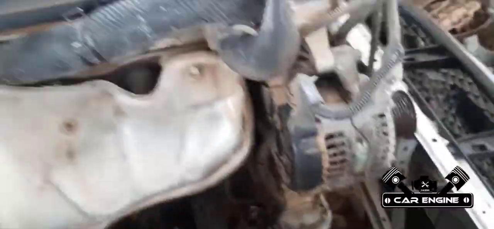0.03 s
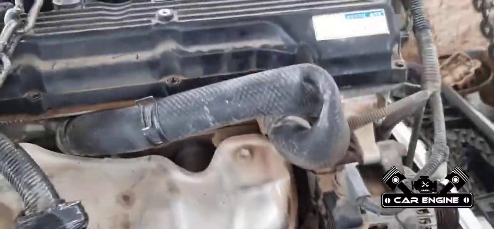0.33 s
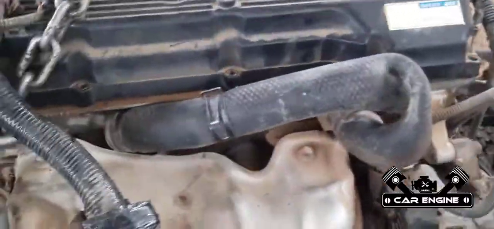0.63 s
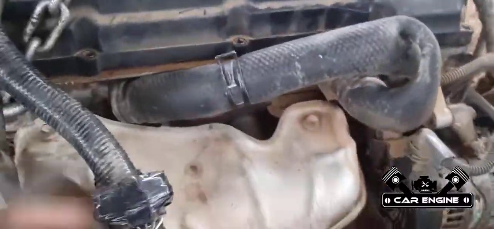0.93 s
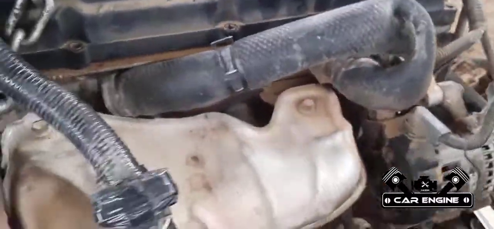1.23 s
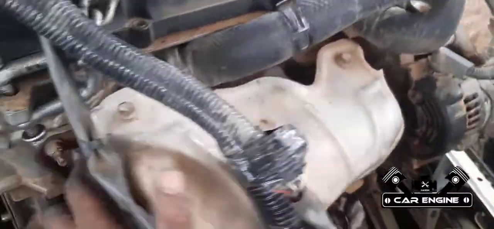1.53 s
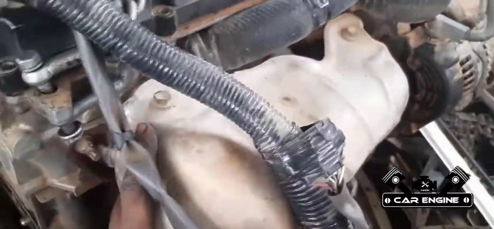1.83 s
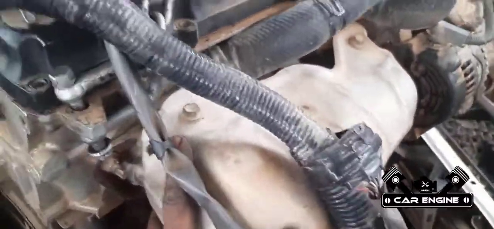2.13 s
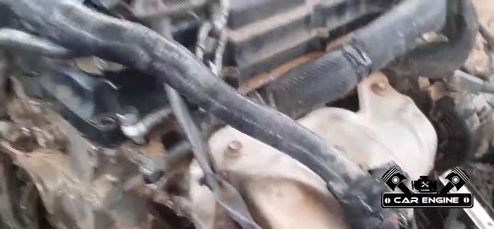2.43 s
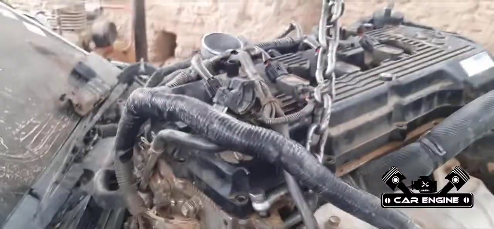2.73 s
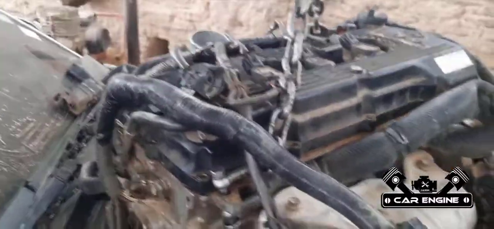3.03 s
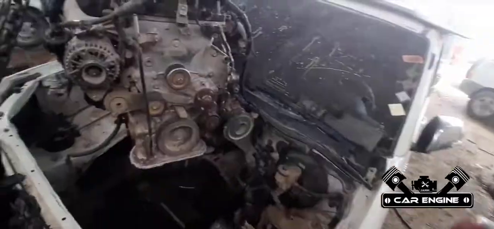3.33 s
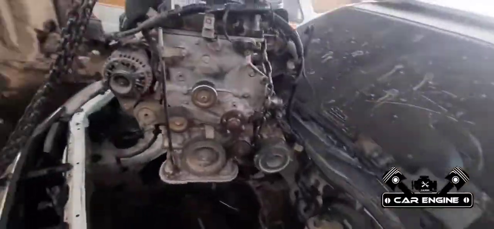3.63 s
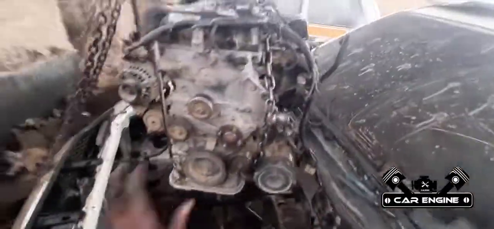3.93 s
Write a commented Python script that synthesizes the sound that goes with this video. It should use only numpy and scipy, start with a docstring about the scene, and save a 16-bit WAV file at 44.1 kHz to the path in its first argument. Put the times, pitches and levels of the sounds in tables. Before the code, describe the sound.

A chain hoist rattles close by, its links clacking and jingling in quick pulls.

```python
"""A chain hoist lifts an engine in an open workshop, close by and to the right. The hand chain is hauled about
three times a second: its links clack over the wheel and ring the housing, the rest jingles, and the slack loop
knocks about between pulls. After a soft bump on the microphone and a moment of near silence, the scene changes:
another chain runs with a duller, denser rattle."""
import sys
import numpy as np
from scipy import signal
from scipy.fft import rfft, irfft, next_fast_len
from scipy.io import wavfile
from scipy.ndimage import uniform_filter1d

SR = 44100
rng = np.random.default_rng(int(sys.argv[2]) if len(sys.argv) > 2 else 0)


def master_out(mix):
    """Clip the mix to full scale and print it as 16-bit PCM to the path in sys.argv[1]."""
    frames = np.transpose(np.atleast_2d(mix))
    ceiling = np.clip(frames, -1, 1)
    pcm = np.round(ceiling * 32767).astype(np.int16)
    wavfile.write(sys.argv[1], SR, pcm)


N = 176400


def amp(db):
    return 10 ** (np.asarray(db) / 20)


def curve_at(points, hz):
    """Interpolate (freq_hz, value) points on a log axis."""
    point_hz, values = np.transpose(points)
    return np.interp(np.log(hz + 1), np.log(point_hz + 1), values)


def convolved(x, response):
    return signal.fftconvolve(np.atleast_2d(x), np.atleast_2d(response), axes=1)[:, :N]


def body(x, colour, resonances=(), size=8192):
    """Minimum-phase body of unit energy: broad colour plus resonances."""
    hz = np.fft.rfftfreq(size, 1 / SR)
    lift = 1 + sum((amp(db) ** 2 - 1) / (1 + (2 * (hz - centre_hz) / width_hz) ** 2)
                   for centre_hz, width_hz, db in resonances)
    cepstrum = irfft(np.log(amp(curve_at(colour, hz)) * np.sqrt(np.abs(lift)) + 1e-6))
    cepstrum[1:size // 2] *= 2
    cepstrum[size // 2 + 1:] = 0
    response = irfft(np.exp(rfft(cepstrum)))
    return convolved(x, response / np.linalg.norm(response))


def bursts(times_s, levels_db, t60_s, attack_s=0.0024):
    """A dying noise burst per contact, in two independent channels."""
    power = np.bincount((np.abs(times_s) * SR).astype(int), amp(levels_db) ** 2, N)[:N]
    t = np.arange(SR // 4) / SR
    envelope = amp(-60 * t / t60_s) * (1 - np.exp(-t / attack_s))
    return np.sqrt(np.abs(convolved(power, envelope ** 2))) * rng.standard_normal((2, N))


def rattle(rate_hz, spread_db, t60_s, count=4000):
    """Contacts of uneven spacing and strength, rms 1."""
    jitter, strength = rng.standard_normal((count, 2)).T
    times_s = (np.arange(count) + 0.5 * jitter) / rate_hz
    contacts = bursts(times_s, spread_db * np.clip(strength, -2, 2), t60_s)
    return contacts / np.sqrt(np.mean(contacts ** 2) + 1e-20)


def struck_modes(hits, modes, attack_s=0.001, detune=0.015):
    """Each (start_s, level_db) hit rings the modes, varying slightly in pitch and strength."""
    t = np.arange(SR // 8) / SR
    attack = 1 - np.exp(-t / attack_s)
    out = np.zeros((2, N + SR))
    for start_s, hit_db in hits:
        for hz, mode_db, t60_s in modes:
            pitch_jitter, jitter_db = rng.standard_normal(2)
            tone = np.sin(2 * np.pi * (hz * (1 + detune * pitch_jitter) * t + rng.random((2, 1))))
            decay = amp(hit_db + mode_db + jitter_db - 60 * t / t60_s)
            out[:, round(start_s * SR):][:, :len(t)] += tone * decay * attack
    return out[:, :N]


# Workshop background: freq_hz, gain_db
AIR_COLOUR = [(25, -17), (120, 9.5), (500, -24), (2200, -10), (12000, -23)]


def workshop(x, echo_db=-6.5, t60_s=0.11, air_db=-55.5):
    """Add the short, weak echo and steady background of the open workshop."""
    t = np.arange(SR // 2) / SR
    tail = rng.standard_normal((2, len(t))) * amp(-60 * t / t60_s) * (t > 0.004)
    air = amp(air_db) * body(rng.standard_normal((2, N)), AIR_COLOUR)
    return x + amp(echo_db) * convolved(x, tail / np.linalg.norm(tail[0])) + air


# Balance of the hauling and of the duller run: freq_hz, left_minus_right_db
HAUL_BALANCE = [(100, -1), (400, -3), (1700, -1.5), (3100, -9), (3700, -18), (6200, -15), (9000, -23),
                (14000, -11)]
RUN_BALANCE = [(100, -1.5), (1250, -1.5), (2100, -14.5), (3000, -21), (4300, -12.5), (6300, -26),
               (15000, -4.5)]
# Likeness of the two sides: freq_hz, coherence
COHERENCE = [(60, 1), (200, 1), (1300, 0.75), (2400, 0), (4000, 0.23)]


def placed(pair, balance):
    """Mix two independent channels to stereo: bass alike, treble to the right."""
    size = next_fast_len(N + SR // 4)
    hz = np.fft.rfftfreq(size, 1 / SR)
    coherence = np.clip(curve_at(COHERENCE, hz), 0, 1)
    left_gain = amp(curve_at(balance, hz))
    angle = np.arccos(coherence) / 2
    mid, side = rfft(pair, size) * np.array([np.cos(angle), np.sin(angle)])
    mono_gain = np.sqrt(1 + left_gain ** 2 + 2 * coherence * left_gain) / 2
    return irfft(np.array([left_gain * (mid + side), mid - side]) / mono_gain, size)[:, :N]


def bump(start_s=3.278, pitch_hz=300, level_db=-10, attack_s=0.002, t60_s=0.02, sag_s=0.033):
    """A soft low thud on the microphone, sagging in pitch."""
    t = np.maximum(np.arange(N) / SR - start_s, 0)
    envelope = amp(level_db - 60 * t / t60_s) * (1 - np.exp(-t / attack_s))
    return envelope * np.sin(2 * np.pi * pitch_hz * t / (1 + t / sag_s))


# Slack-loop swings in the hauling and in the duller run: start_s, length_s, level_db
HAUL_SWINGS = [(0.004, 0.076, -37.5), (0.108, 0.028, -36), (1.15, 0.073, -46), (0.345, 0.09, -37),
               (0.688, 0.077, -40.5), (0.885, 0.028, -38), (1.01, 0.057, -39), (1.38, 0.046, -38),
               (1.7, 0.17, -38), (2.065, 0.1, -40), (2.18, 0.029, -36), (2.765, 0.072, -38)]
RUN_SWINGS = [(3.33, 0.24, -59), (3.93, 0.18, -32)]
# Slack-loop knock: freq_hz, gain_db
SLACK_COLOUR = [(30, -43), (80, -14.5), (135, -1.5), (370, 3), (560, 0), (800, 1.5), (1400, -1.5),
                (2300, 0.5), (4000, -0.5), (9000, -36.5)]


def slack_loop(swings, swing_db=8, rest_db=-40.5):
    """The hanging loop knocks dully, swelling with each swing."""
    t = np.arange(N) / SR
    gain = amp(rest_db)
    for start_s, length_s, db in swings:
        progress = np.clip((t - start_s) / length_s, 0, 1)
        gain = gain + amp(db + swing_db) * np.sqrt(np.abs(np.sin(np.pi * progress)))
    return body(gain * rattle(rate_hz=170, spread_db=2, t60_s=0.035), SLACK_COLOUR)


# Free links: start_s, pitch_hz, level_db
CLINKS = [(0.03, 3140, -21), (0.56, 3790, -27), (0.646, 3200, -13.5), (0.921, 4380, -17),
          (0.921, 4880, -17.5), (0.997, 4580, -21.5), (1.559, 4280, -22), (1.779, 3070, -16),
          (1.799, 2950, -23), (2.055, 4110, -15), (2.111, 3160, -20)]


def clinks(t60_s=0.1):
    """Single links swing free and ring at their own pitch."""
    return sum(struck_modes([(start_s, db)], [(hz, 0, t60_s)]) for start_s, hz, db in CLINKS)


# Running-chain envelope: time_s, level_db
RUN_ENVELOPE = [(3.33, -25), (3.4, -22.5), (3.48, -30), (3.57, -29), (3.66, -24.5), (3.73, -22.5),
                (3.86, -19.5), (3.915, -25), (3.96, -21.5), (4, -24)]
# Heavy clashes: start_s, level_db
RUN_CLASHES = [(3.349, -5.5), (3.392, -13), (3.439, -11.5), (3.522, -12.5), (3.62, -9.5), (3.672, -7.5),
               (3.716, -5.5), (3.79, -22)]
# Modes rung by the running links: pitch_hz, level_db, t60_s
RUN_MODES = [(835, -2, 0.05), (868, -3, 0.05), (2880, -3, 0.05), (3000, -2, 0.05)]
# Dull rattle: freq_hz, gain_db
RUN_COLOUR = [(30, -21), (100, -7), (500, -10.5), (750, -1.5), (1050, 1.5), (1600, 5), (1880, -2),
              (3300, 3), (4000, -0.5), (4800, -3), (5500, 1), (6500, -2.5), (7600, -11.5), (8600, -21.5),
              (10000, -16), (15800, -19)]
# Its resonances: centre_hz, width_hz, lift_db
RUN_RESONANCES = [(2220, 140, 7.7), (2956, 66, 9.7)]


def dull_run(start_s, ring_end_s=3.89, link_rate_hz=63, rattle_db=-3, clash_db=-10.5):
    """Another chain runs, rattling and clashing; its links ring lower and stop ringing near the end."""
    envelope_s, envelope_db = np.transpose(RUN_ENVELOPE)
    gain = amp(rattle_db + np.interp(np.arange(N) / SR, envelope_s, envelope_db))
    rattling = gain * rattle(rate_hz=240, spread_db=4.5, t60_s=0.076)
    hits_s = np.arange(start_s, ring_end_s, 1 / link_rate_hz)
    ringing = struck_modes(zip(hits_s, np.interp(hits_s, envelope_s, envelope_db)), RUN_MODES)
    times_s, levels_db = np.transpose(RUN_CLASHES)
    clashes = bursts(times_s, levels_db + clash_db, t60_s=0.073)
    return ringing + body(rattling + clashes, RUN_COLOUR, RUN_RESONANCES)


# Steel on steel: freq_hz, gain_db
STEEL_COLOUR = [(100, -28), (800, -19), (1150, -6), (2700, -1), (3400, 1.5), (4600, 4.5), (5800, -4.5),
                (7700, -4), (9800, -4.5), (12200, -24), (13500, -18.5), (15800, -16)]
# Link and housing resonances: centre_hz, width_hz, lift_db
STEEL_RESONANCES = [(1134, 84, 19.5), (1690, 81, 11.5), (3110, 120, 7.5), (4117, 41, 8.5), (4365, 34, 7.5),
                    (6215, 90, 10.5), (7500, 165, 9), (8020, 133, 11)]


def steel(contacts):
    """Contacts excite the steel of the links and housing."""
    return body(contacts, STEEL_COLOUR, STEEL_RESONANCES)


# Hand-chain pulls: start_s, release_s, level_db
PULLS = [(-.05, 0.026, -20.5), (0.21, 0.39, -21.5), (0.476, 0.664, -21.5), (.86, 1.01, -23.5),
         (1.184, 1.404, -20), (1.555, 1.773, -23), (1.91, 2.101, -21), (2.246, 2.457, -26.5),
         (2.62, 2.821, -22), (2.962, 3.183, -23)]


def jingle(level_db=-3.5, rest_db=-32.5, swell_db=7, attack_s=0.0036, coast_s=0.13):
    """Links jostle, louder as each pull gathers speed, and settle once the hand lets go."""
    t = np.arange(N) / SR
    power = amp(rest_db) ** 2
    for start_s, release_s, db in PULLS:
        remaining = np.clip((release_s - t) / (release_s - start_s), 0, 1)
        attack = np.clip((t - start_s) / attack_s, 0, 1)
        coast = np.clip(1 - (t - release_s) / coast_s, 0, 1)
        power = power + (amp(db - swell_db * remaining) * attack * coast) ** 2
    contacts = rattle(rate_hz=290, spread_db=1.5, t60_s=0.021)
    return amp(level_db) * steel(np.sqrt(power) * contacts)


# Links striking the wheel: start_s, level_db
LINK_HITS = [(0.001, -16), (0.034, -14), (0.058, -14), (0.092, -19), (0.148, -21), (0.184, -21),
             (0.246, -18), (0.269, -17), (0.293, -14), (0.314, -13), (0.354, -14), (0.371, -14),
             (0.388, -15), (0.423, -16), (0.497, -14), (0.559, -14), (0.577, -12), (0.596, -13),
             (0.615, -15), (0.633, -12), (0.651, -14), (0.81, -17), (0.842, -13), (0.867, -17),
             (0.919, -15), (0.937, -18), (0.973, -12), (0.996, -15), (1.063, -16), (1.176, -19),
             (1.227, -14), (1.25, -14), (1.273, -11), (1.294, -15), (1.312, -17), (1.329, -15),
             (1.343, -14), (1.36, -14), (1.421, -12), (1.438, -14), (1.461, -17), (1.537, -18),
             (1.558, -15), (1.582, -17), (1.638, -16), (1.658, -16), (1.68, -16), (1.7, -16), (1.721, -16),
             (1.751, -15), (1.918, -16), (1.941, -17), (1.967, -14), (1.989, -17), (2.011, -10),
             (2.027, -14), (2.062, -14), (2.095, -13), (2.11, -14), (2.237, -21), (2.271, -18), (2.3, -16),
             (2.374, -20), (2.403, -16), (2.427, -16), (2.451, -15), (2.503, -18), (2.537, -21),
             (2.626, -21), (2.658, -20), (2.718, -14), (2.74, -15), (2.762, -16), (2.781, -14), (2.83, -14),
             (2.849, -13), (2.942, -16), (2.964, -13), (2.986, -13), (3.008, -15), (3.067, -15),
             (3.084, -14), (3.103, -14), (3.121, -12), (3.141, -12), (3.159, -11), (3.177, -14),
             (3.199, -16), (3.225, -17), (3.254, -17)]
# Housing modes, and modes that sing in the last pulls: pitch_hz, level_db, t60_s
HOUSING_MODES = [(1140, -6.5, .03), (1195, -2.5, .038), (1580, -8, .03), (1700, -3, .044)]
SINGING_MODES = [(1718, -5.5, 0.13), (4280, -2, 0.11)]


def links_on_wheel(crack_db=0.5, housing_db=-2, singing_db=-4, singing_from_s=2.65):
    """Each link cracks against the wheel and rings the housing; two modes sing out in the last pulls."""
    times_s, levels_db = np.transpose(LINK_HITS)
    cracks = steel(bursts(times_s, levels_db + crack_db, t60_s=0.045))
    late_hits = [(start_s, db) for start_s, db in LINK_HITS if start_s > singing_from_s]
    singing = amp(singing_db) * struck_modes(late_hits, SINGING_MODES)
    housing = amp(housing_db) * struck_modes(LINK_HITS, HOUSING_MODES)
    return cracks + housing + singing


def scene(gap_start_s=3.308, gap_end_s=3.328, gap_db=-28.5):
    """Hauling, a moment of near silence, then the scene changes to the duller run."""
    t = np.arange(N) / SR
    hauled_chain = links_on_wheel() + clinks() + jingle() + slack_loop(HAUL_SWINGS)
    hauling = workshop(placed(hauled_chain, HAUL_BALANCE) + bump())
    running_chain = dull_run(gap_end_s) + slack_loop(RUN_SWINGS)
    running = workshop(placed(running_chain, RUN_BALANCE))
    gates = np.array([t < gap_start_s, t > gap_end_s], float)
    before, after = uniform_filter1d(gates, size=90, axis=1)  # 2 ms fades
    gap = (1 - before) * (1 - after)
    return hauling * before + running * (after + amp(gap_db) * gap)


def record(dry, limit=0.45, cutoff_hz=15950):
    """Soft-limit the peaks, then low-pass."""
    rounded = dry / (1 + (dry / limit) ** 6) ** (1 / 6)
    size = next_fast_len(N + SR // 4)
    passband = np.fft.rfftfreq(size, 1 / SR) < cutoff_hz
    return irfft(rfft(rounded, size) * passband, size)[:, :N]


dry = scene()
out = record(dry)
master_out(out)
```